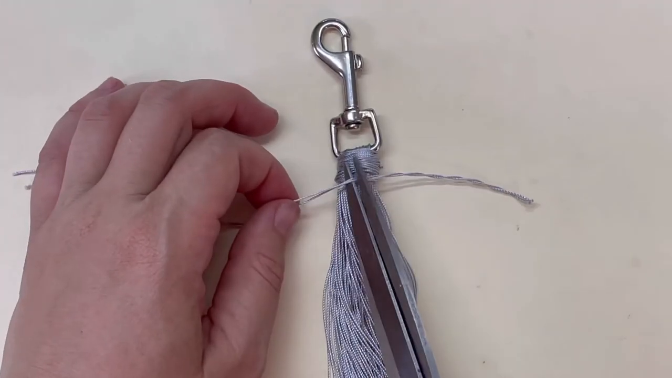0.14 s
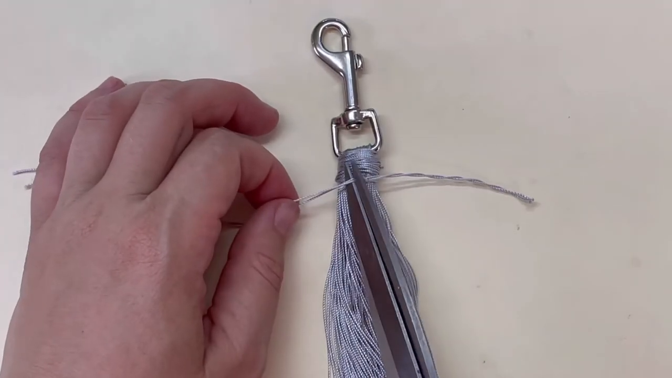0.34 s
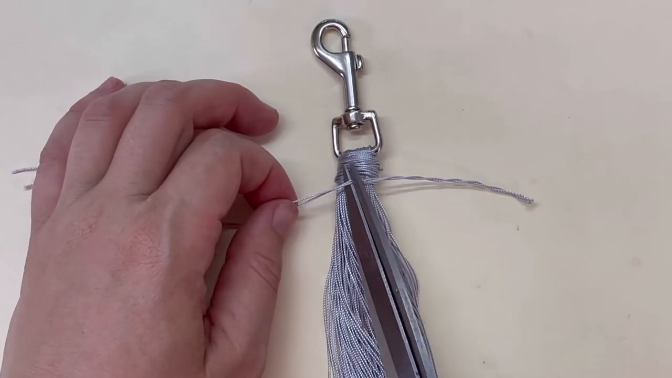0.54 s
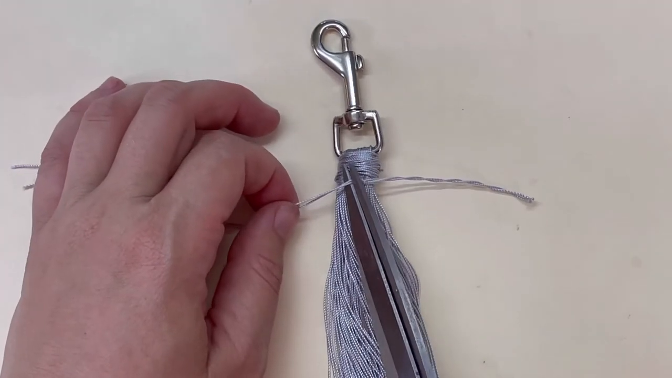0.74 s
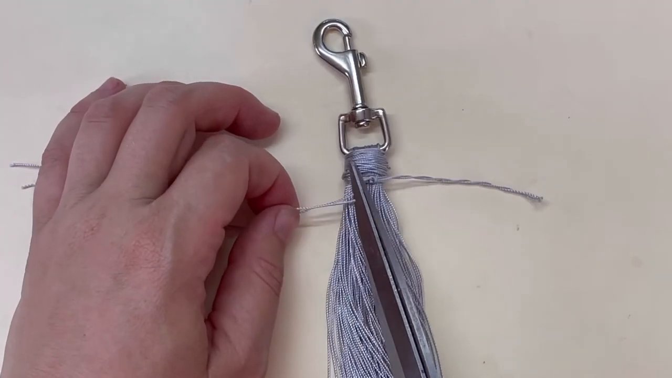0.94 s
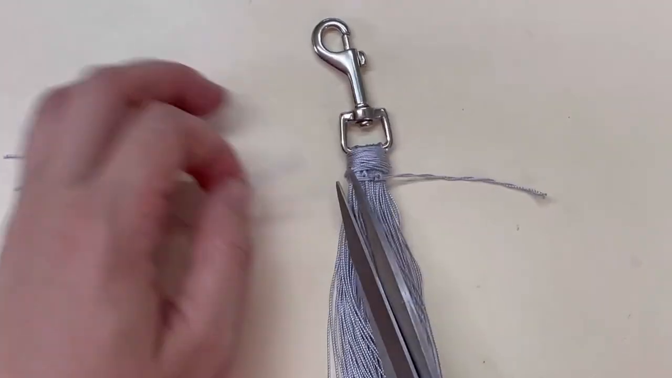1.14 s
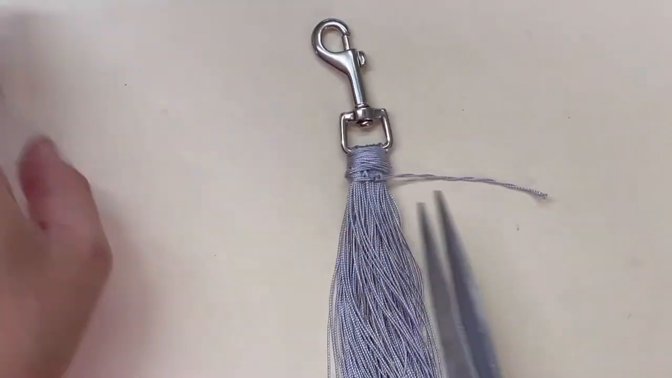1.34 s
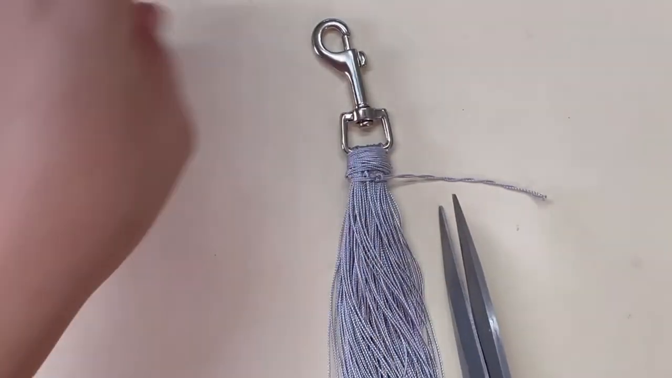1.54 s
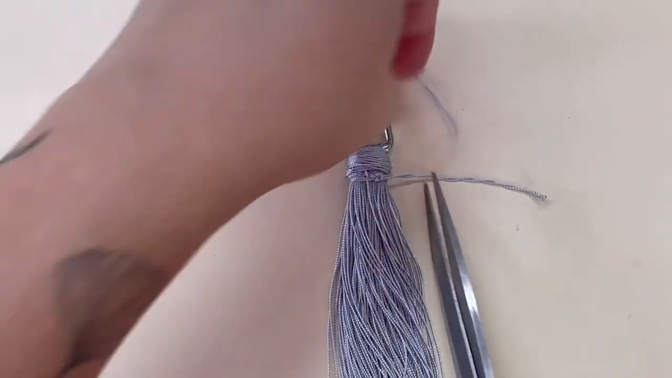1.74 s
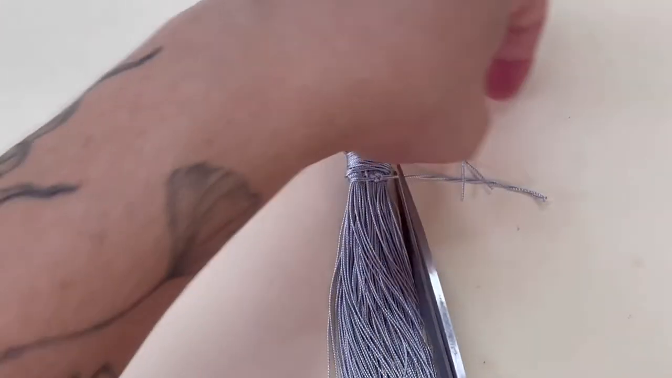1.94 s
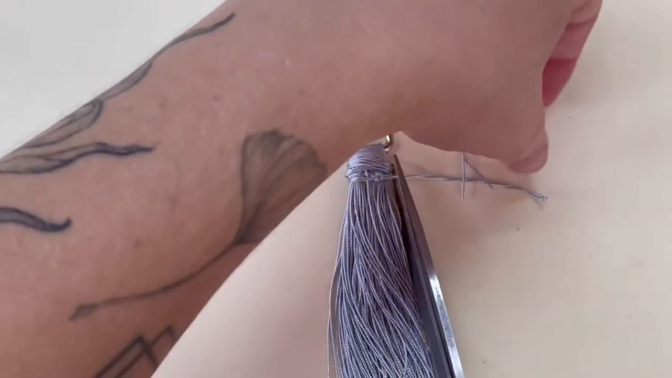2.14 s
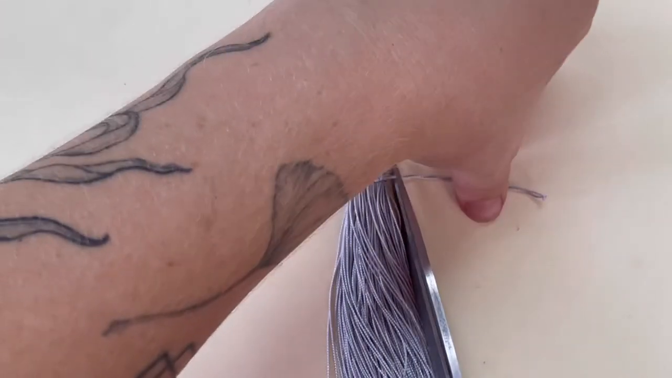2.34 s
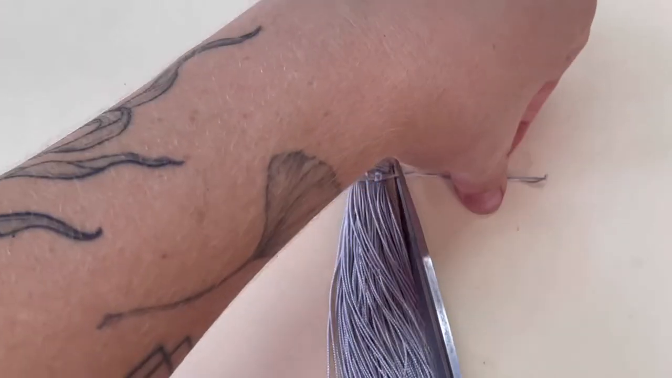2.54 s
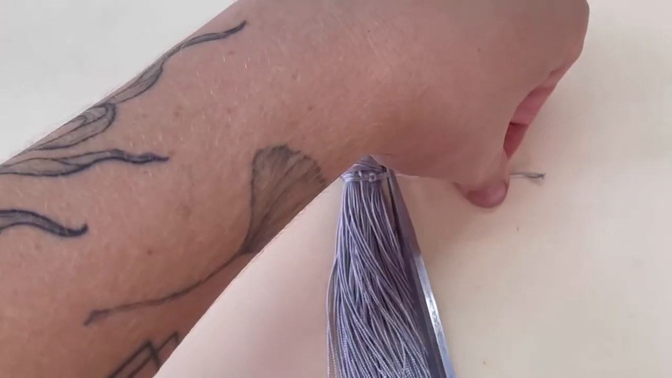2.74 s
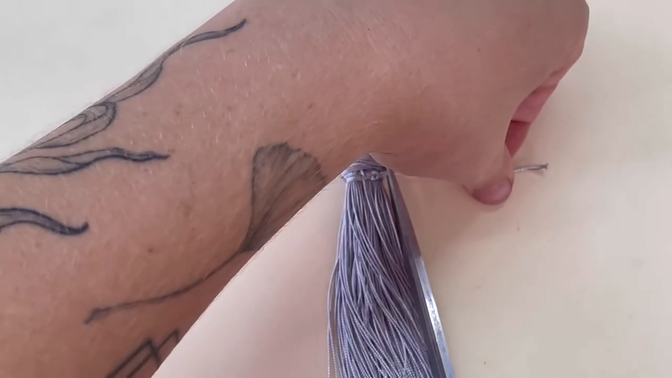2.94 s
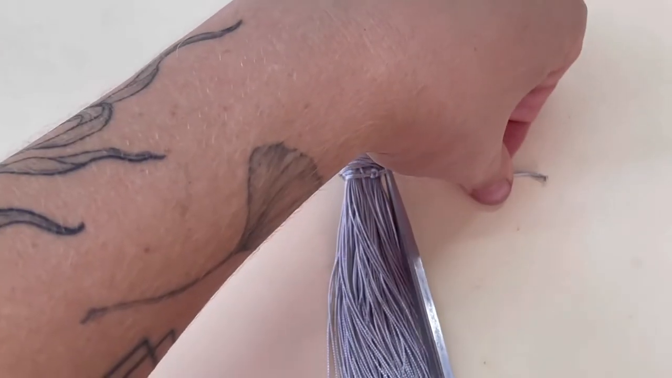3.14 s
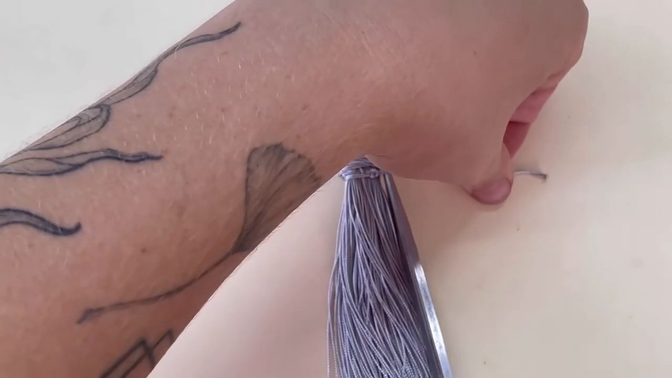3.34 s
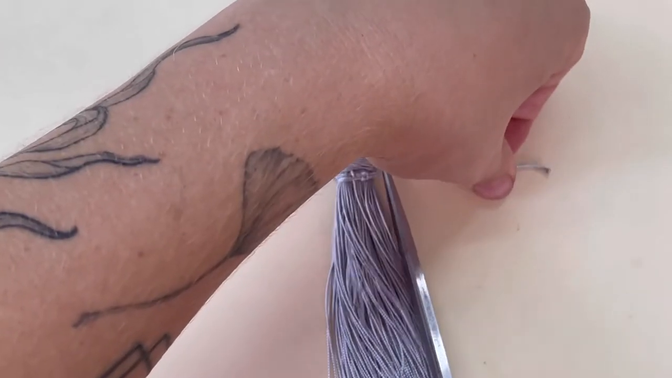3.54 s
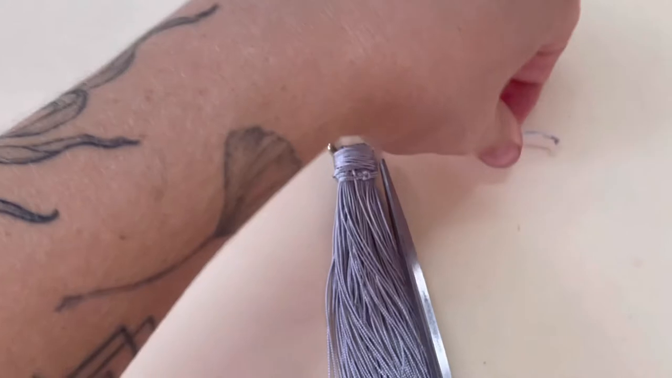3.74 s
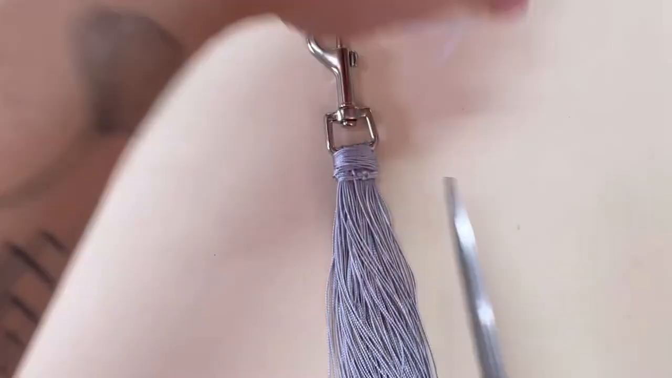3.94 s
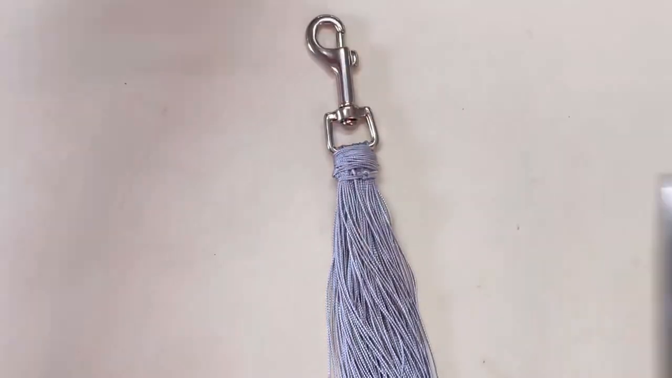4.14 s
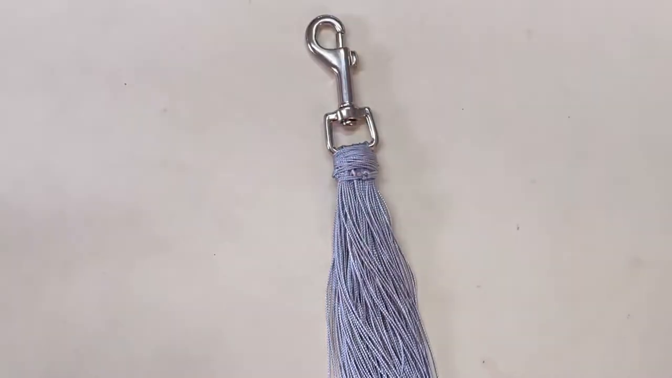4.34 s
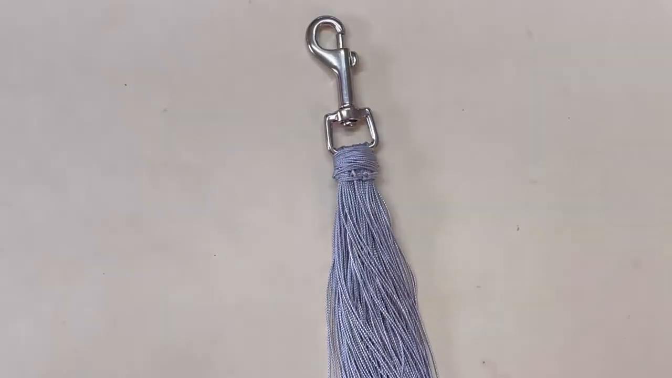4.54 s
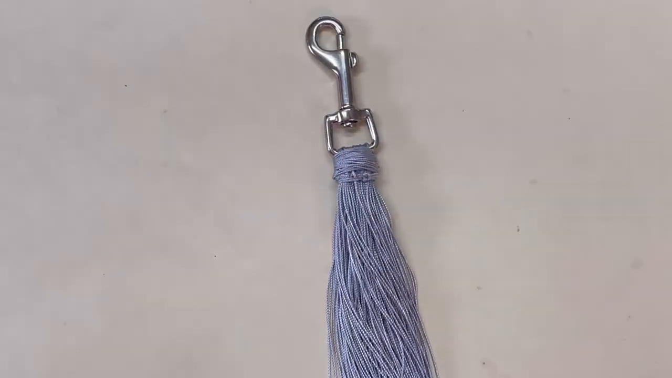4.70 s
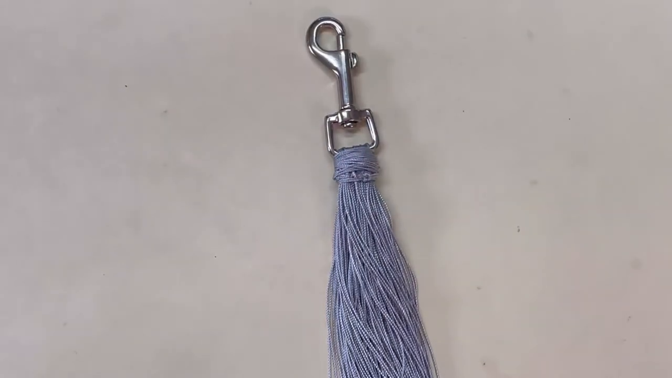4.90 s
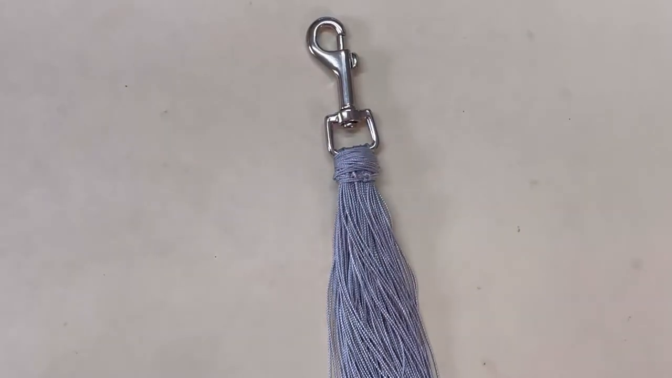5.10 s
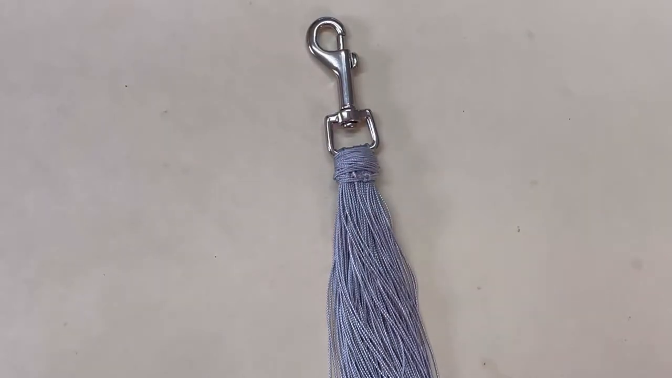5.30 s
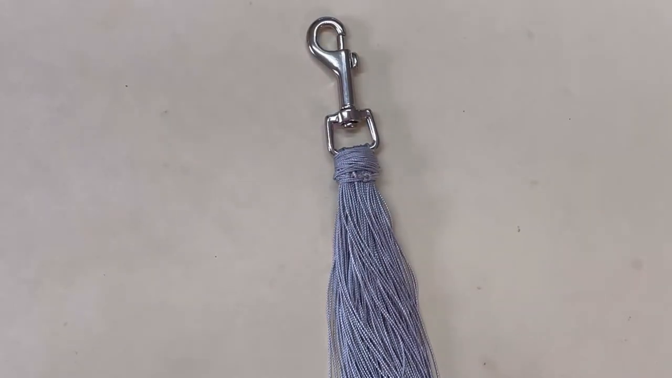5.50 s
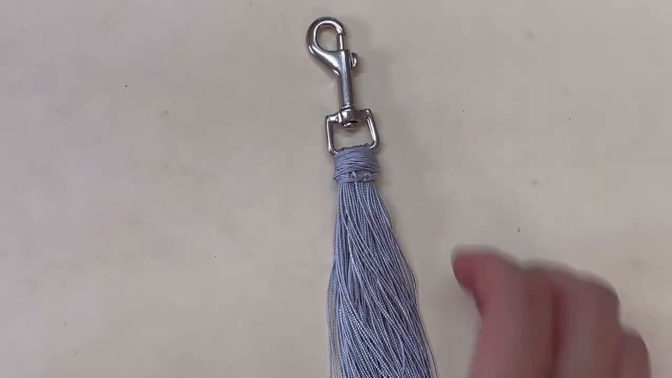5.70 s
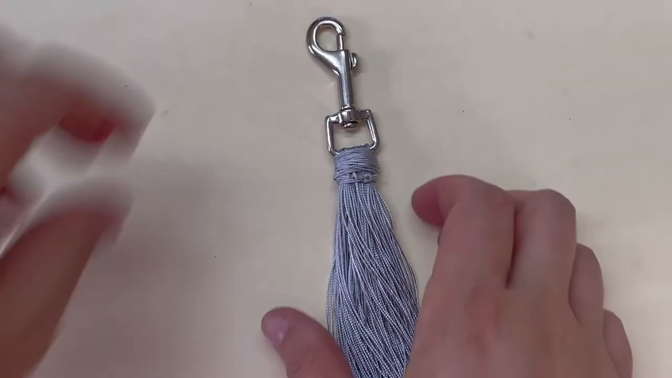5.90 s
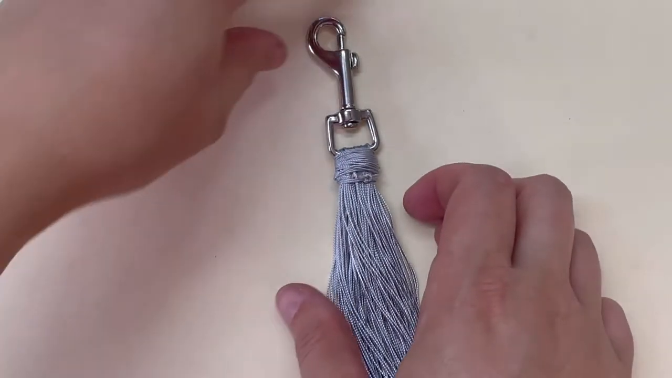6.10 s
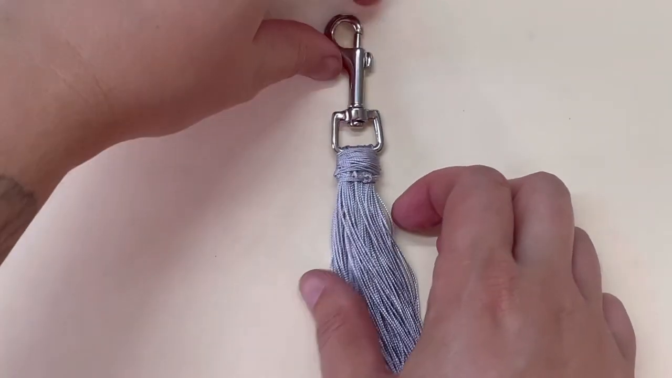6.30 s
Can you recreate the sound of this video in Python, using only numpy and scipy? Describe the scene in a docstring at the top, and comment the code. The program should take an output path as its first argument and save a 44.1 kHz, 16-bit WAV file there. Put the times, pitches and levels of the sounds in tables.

```python
"""Small steel scissors trim two thread ends from a tassel on a table, close to a phone in a small room.
Each snip is a burst of parting fibres (noise), a snap (damped modes, smeared impact) and a ring (sines).
The scissors are laid down with knocks: dispersive bending waves that run through the table top as
falling chirps, with its modes and sway. Hands slide softly over its surface as grainy friction noise;
light ticks, catching blades, scrapes and a steady low room tone complete the scene."""
import sys
import numpy as np
from scipy import signal
from scipy.fft import rfft, irfft
from scipy.io import wavfile
from scipy.ndimage import uniform_filter1d

SR = 44100
rng = np.random.default_rng(int(sys.argv[2]) if len(sys.argv) > 2 else 0)


def materialize(psi):
    """Save the field psi as 16-bit PCM at rate SR to the path in sys.argv[1].

    A 1-D psi becomes a single channel; in a 2-D psi each row is a channel.
    """
    bounded = np.clip(np.atleast_2d(psi).T, -1, 1)
    quanta = np.round(bounded * 32767).astype(np.int16)
    wavfile.write(sys.argv[1], SR, quanta)


N = 284886
T = np.arange(N) / SR
AGE = T[:2 ** 15]  # time since a hit [s]
SIDES = np.array([[1], [-1]])  # left, right


def undb(db):
    """Level to amplitude: 20 dB is a factor of ten."""
    return 10 ** (np.asarray(db) / 20)


def bins(x):
    """Fourier frequencies of x [Hz], kept above zero for logarithms."""
    return np.maximum(np.fft.rfftfreq(x.shape[-1], 1 / SR), 1)


def along(hz, points):
    """Linear interpolation of (frequency [Hz], value) points on a log-frequency axis."""
    point_hz, value = np.transpose(points)
    return np.interp(np.log(hz), np.log(point_hz), value)


def colour(x, points):
    """Minimum-phase filtering through (frequency [Hz], level [dB]) points by folding the cepstrum."""
    n = x.shape[-1]
    cepstrum = irfft(np.log(undb(along(bins(x), points))), n)
    cepstrum[1:n // 2] *= 2
    cepstrum[n // 2 + 1:] = 0
    return irfft(rfft(x) * np.exp(rfft(cepstrum)), n)


def noise(points):
    """Stationary random noise of rms 1 with the given spectral shape."""
    x = colour(rng.standard_normal(N), points)
    return x / x.std()


def blow(x):
    """Energy normalisation: a hit gets the energy of 5 ms at rms 1."""
    return x / np.sqrt(np.sum(x ** 2) / (.005 * SR))


def fade(t60):
    """Exponential damping: 60 dB of decay in t60 [s]."""
    return np.exp(-np.log(1000) * AGE / t60)


def onset(build_s):
    """Gradual energy build-up over about build_s [s]."""
    return 1 - np.exp(-(AGE / build_s) ** 2)


def burst(t60):
    """Exponentially damped random noise."""
    return rng.standard_normal(len(AGE)) * fade(t60)


def ring(modes):
    """Modal superposition: damped sines with random phases, from (frequency [Hz], level [dB], t60 [s])."""
    partials = (undb(db) * fade(t60) * np.sin(2 * np.pi * (hz * AGE + rng.random()))
                for hz, db, t60 in modes)
    return blow(sum(partials))


def add(out, s, x):
    """Linear superposition: mix x into out at time s [s]."""
    i = int(s * SR)
    out[i:i + len(x)] += x[:N - i]


def walk(rate):
    """Low-pass random fluctuation with a standard deviation of 1; rate in steps per second."""
    step = int(SR / rate)
    held = np.repeat(rng.standard_normal(N // step + 1), step)
    x = uniform_filter1d(held, step)[:N]
    return x / x.std()


# spectral shape of the room tone: (frequency [Hz], relative level [dB])
RUMBLE = [(20, -17), (35, -10.5), (48, -5.5), (62, 4), (75, 4), (90, 2), (125, -10), (180, -17.5),
          (300, -26.5), (600, -38), (1500, -45), (4000, -51), (12500, -51), (15500, -72.5)]
RUMBLE_DB = -56.5


def room_tone():
    """Stationary background noise, strongest at low frequencies."""
    return undb(RUMBLE_DB) * noise(RUMBLE)


def room(x, wet_db=-21, t60=0.3, build_s=0.0023):
    """Diffuse reverberation of a small furnished room: echoes build up, then decay exponentially."""
    tail = burst(t60) * onset(build_s)
    tail = colour(tail, [(200, -1.0), (1500, 0.0), (3000, -6.0), (7000, 0.5), (12500, -2.5), (15500, -6.5)])
    return undb(wet_db) * signal.fftconvolve(x, tail / np.sqrt(np.sum(tail ** 2)))[:N]


# first echoes from the table top and things on it: (delay [s], level re direct sound [dB])
ECHOES = [(.00075, -24.5), (.0039, -21)]


def reflect(x):
    """Comb filtering: delayed reflections from hard surfaces interfere with the direct sound."""
    echoes = sum(undb(db) * np.exp(-2j * np.pi * bins(x) * lag) for lag, db in ECHOES)
    return irfft(rfft(x) * (1 + echoes), N)


def ports(x, phase):
    """Interaural-style phase difference: the left port leads the right by (frequency [Hz], phase [rad])."""
    return irfft(rfft(x) * np.exp(.5j * SIDES * along(bins(x), phase)), N)


def move(start, end, attack_s, release_db_per_s):
    """Contact envelope of sliding: it sets in around start, holds, and dies away exponentially after end."""
    attack = np.clip((T - start) / attack_s + .5, 0, 1)
    return attack * undb(-release_db_per_s * np.maximum(T - end, 0))


def friction(points, patchy_db=2.75, shift_rate=22, catch_rate=200, catch_db=9):
    """Stick-slip noise: dense slips and sparse larger catches; quarter-octave bands wander in level."""
    catches = (rng.random(N) < catch_rate / SR) * rng.laplace(size=N)
    slips = rfft(colour(rng.standard_normal(N) + undb(catch_db) * catches, points))
    band = np.floor(4 * np.log2(np.maximum(bins(T), 400) / 400))  # one band up to 400 Hz
    x = sum(irfft(slips * (band == k), N) * undb(patchy_db * walk(shift_rate)) for k in np.unique(band))
    return x / x.std()


# skin sliding over the table: (start [s], fastest [s], end [s], relative friction at the fastest [dB],
# swell [dB], fine hiss re friction [dB], relative board murmur [dB])
STROKES = [(1.412, 1.665, 1.81, -69, 5.5, 0.5, -71), (1.772, 1.94, 2.045, -68, 6, 3, -70.5),
           (2.041, 2.077, 2.19, -78, 22.5, 0.5, -65.5), (2.225, 2.254, 2.38, -75, 8, 1.5, -70.5),
           (2.631, 2.78, 2.91, -97, 12, -8, -69), (3.99, 4.06, 4.07, -84, 5, 3, -80),
           (4.071, 4.266, 4.306, -64.5, 3.5, -3.5, -66.5), (4.325, 4.47, 4.566, -61, 7.5, -6, -64.5),
           (4.55, 4.557, 4.66, -72.5, 5.5, -4.5, -66.5), (5.28, 5.306, 5.386, -68.5, 6, -13, -65.5),
           (5.389, 5.454, 5.68, -72.5, 7, -5.5, -69), (5.549, 5.632, 5.71, -77, 7, -4, -75),
           (5.71, 5.897, 6.1, -65.5, 9.5, -3, -66), (5.833, 5.895, 6.01, -74, 13, 6.5, -73),
           (6.191, 6.329, 6.52, -72.5, 4, 5, -68.5)]
STROKE_ATTACK_S, STROKE_RELEASE_DB_PER_S = 0.017, 183
BOARD_SWELL = 0.29  # share of the swell that the board murmur follows


def strokes():
    """Speed-dependent friction gains (rub, hiss, board): each stroke swells to its fastest moment and slows."""
    rub, hiss, board = np.zeros((3, N))
    for start, fastest, end, db, swell_db, hiss_db, board_db in STROKES:
        contact = move(start, end, STROKE_ATTACK_S, STROKE_RELEASE_DB_PER_S)
        speed_db = np.interp(T, [start, fastest, end], [-swell_db, 0, -swell_db])
        rub += contact * undb(db + speed_db)
        hiss += contact * undb(db + hiss_db + speed_db)
        board += contact * undb(board_db + BOARD_SWELL * speed_db)
    return rub, hiss, board


# the skin sticks and stutters for a moment: (time [s], length [s], relative level [dB])
SCUFFS = [(1.885, 0.008, -65), (1.911, 0.018, -67), (1.973, 0.025, -64.5), (2.056, 0.027, -71),
          (2.651, 0.021, -75.5), (6.187, 0.01, -66)]
SCUFF_ATTACK_S, SCUFF_RELEASE_DB_PER_S, SCUFF_GRAIN_DB = .006, 700, 5


def scuffs():
    """Stick-slip friction gain: the skin sticks and lets go in quick random jerks."""
    jerks = undb(SCUFF_GRAIN_DB * walk(250))
    return jerks * sum(undb(db) * move(s, s + length, SCUFF_ATTACK_S, SCUFF_RELEASE_DB_PER_S)
                       for s, length, db in SCUFFS)


def hands(rub_db=-1, press_db=0, hiss_db=-1, grain_db=0.88, waver_db=0.63):
    """Sliding friction: skin rubs over the table in tiny slips and sets the board murmuring."""
    slips = undb(grain_db * walk(500) + waver_db * walk(30))
    rub = friction([(250, -16.5), (700, -1.5), (1000, -0.5), (1500, 0.5), (2300, 2.5), (2800, -1.5),
                    (3300, -0.5), (3900, -9.5), (4600, -8.5), (5400, -15.5), (8000, -13.0), (13000, -19),
                    (15000, -29)])
    hiss = noise([(2000, -11.5), (5200, -1.5), (7000, 0), (8600, 4), (10200, -7.5), (11500, 1.5),
                  (12500, 0), (13800, -8.5), (15500, -18)])
    board = noise([(30, -21.0), (70, 3), (130, 11.0), (250, 4), (480, 3.0), (680, -11.5), (920, -12.5),
                   (1400, -27.0), (3000, -34)])
    rub_gain, hiss_gain, board_gain = strokes()
    skin = undb(rub_db) * rub * np.hypot(rub_gain, scuffs()) + undb(hiss_db) * hiss * hiss_gain
    return slips * skin + undb(press_db) * board * board_gain


BRUSH_S, BRUSH_HALF_S, BRUSH_DB = 5.9, 0.032, -60.5  # centre, time from centre to half gain, level


def brush(grain_db=1.5):
    """Resonantly coloured friction: the palm brushes the table with a short, hollow swell."""
    hollow = noise([(300, -29), (650, -7.0), (900, -0.5), (1100, -10), (1600, -19.5), (4000, -30),
                    (8000, -44)])
    return undb(BRUSH_DB + grain_db * walk(300)) * hollow / (1 + ((T - BRUSH_S) / BRUSH_HALF_S) ** 2)


# the whole table swaying on its legs: (frequency [Hz], relative level [dB], t60 [s])
SWAY = [(69, 0.5, 0.22), (84.2, -1, 0.27), (102.3, 2, 0.18), (120.9, 3.5, 0.28), (148.1, -6, 0.16)]


def sway(build_s=.012):
    """Low modes in fixed phase: the boom swells just after a blow, which always pushes the same way."""
    modes = sum(undb(db) * fade(t60) * np.sin(2 * np.pi * hz * AGE) for hz, db, t60 in SWAY)
    return blow(modes * onset(build_s))


# modes of the table top: (frequency [Hz], relative level [dB], t60 [s])
TABLE_MODES = [(182, -0.5, 0.37), (228, -2, 0.19), (263, 4, 0.25), (314, 0, 0.2), (405, -4, .3),
               (452.4, -6, .28), (498, -5, 0.27), (550, 1.5, 0.092), (640, -9.5, .2), (676, -10.5, 0.14),
               (1116, -13.5, .19)]
# how the table top radiates: (frequency [Hz], relative level [dB])
BOARD = [(60, -18.5), (120, -5), (220, -1.5), (400, 1.5), (560, 0), (680, -2.5), (810, -9), (1080, -9),
         (1400, -13.5)]


def knock(contact_hz, spread=.135, edge_db=-13, edge_path=2.75, modes_db=-11.0, wash_db=-16,
          wash_t60=.2, boom_db=-18, boom_t60=0.43, build_s=.014):
    """Bending-wave dispersion: highs outrun lows, an edge echo follows, and modes and noise build up."""
    hz = bins(AGE)
    travel = 4 * np.pi * spread * np.sqrt(hz)  # phase [rad] whose group delay is spread / sqrt(Hz)
    push = 1 / np.sqrt(1 + (hz / contact_hz) ** 7)  # softer contacts lose their highs
    wave = np.exp(-1j * travel)
    edge = undb(edge_db) * np.exp(-1j * travel * edge_path)
    direct = blow(irfft(push * (wave + edge) * undb(along(hz, BOARD))))
    wash = undb(wash_db) * blow(colour(burst(wash_t60), BOARD + [(3000, -38.5)]))
    boom_shape = [(100, -7.5), (250, -0.5), (450, -2), (700, -13), (1100, -17), (2000, -40)]
    boom = undb(boom_db) * blow(colour(burst(boom_t60), boom_shape))
    tail = (undb(modes_db) * ring(TABLE_MODES) + wash + boom) * onset(build_s)
    return direct + irfft(push * wave * rfft(tail))


# soft bumps of wrist and hand on the table top: (time [s], level [dB], contact bandwidth [Hz])
BUMPS = [(1.068, -58, 604), (1.4295, -31, 208), (2.059, -53, 460), (2.295, -53, 267.6), (4.074, -60, 808),
         (6.184, -57.5, 800)]
BUMP_SWAY_DB, BUMP_SWAY_SLOPE = -12.5, 0.59  # sway after a bump of 0 dB; dB of sway per dB of bump
# the scissors land, tips first, then the handles:
# (time [s], level [dB], contact bandwidth [Hz], sway from the weight behind it [dB])
LANDINGS = [(4.766, -20, 847, -33), (4.768, -22, 225, -37.5), (4.7982, -28.5, 927, -33.5),
            (5.0043, -14.5, 591.8, -23.5), (5.0266, -23.5, 563, -36), (5.0395, -18, 616, -26),
            (5.077, -18, 532, -30)]


def table():
    """Impact excitation: hand and scissors strike the table top, which rings and sways under their weight."""
    out = np.zeros(N)
    for s, db, contact_hz in BUMPS:
        bump_sway = undb(BUMP_SWAY_DB + BUMP_SWAY_SLOPE * db)
        add(out, s, undb(db) * knock(contact_hz) + bump_sway * sway())
    for s, db, contact_hz, sway_db in LANDINGS:
        add(out, s, undb(db) * knock(contact_hz) + undb(sway_db) * sway())
    return out


# steel scraping on thread and table:
# (start [s], end [s], relative level [dB], relative table drone [dB])
SCRAPES = [(1.041, 1.072, -57.5, -63), (1.13, 1.143, -71.5, -64), (4.761, 5.076, -60.5, -52.5)]
SCRAPE_ATTACK_S, SCRAPE_RELEASE_DB_PER_S = 0.011, 273
# spectral shape of rough steel contact, also heard in the catches: (frequency [Hz], relative level [dB])
STEEL = [(300, -29), (500, -0.5), (900, -7), (1500, -4.5), (2700, 0.5), (3700, -1), (4500, -2.5),
         (6200, -4.5), (8000, -10), (10500, -5.5), (12500, -11), (15500, -21.5)]


def scrapes(gain_db=-1, grain_db=2.0, board_db=1):
    """Rough sliding friction: the blades drag with a catching grain, and pressed on the table make it drone."""
    steel = undb(gain_db + grain_db * walk(500)) * friction(STEEL)
    board = noise([(25, -24.0), (55, -2.5), (110, 7), (300, -13.0), (460, -2.0), (650, -16.0),
                   (900, -18.0), (2000, -44.5)])
    out = np.zeros(N)
    for start, end, db, drone_db in SCRAPES:
        contact = move(start, end, SCRAPE_ATTACK_S, SCRAPE_RELEASE_DB_PER_S)
        out += contact * (undb(db) * steel + undb(board_db + drone_db) * board)
    return out


# catches of the reopening blades: (time [s], level before the treble tilt [dB], treble from 10 kHz up [dB])
CHATTER = [(1.0496, -51.5, -1.5), (1.0632, -53.5, -7), (1.0689, -54, -7), (1.0793, -53, 1.5)]
# resonances of the half-open blades: (frequency [Hz], t60 [s], relative level [dB])
CHATTER_MODES = [(2240, 0.01, -7), (2750, 0.014, -4), (3500, 0.014, -12), (4960, 0.0087, -17),
                 (6200, 0.011, -9), (8700, .008, -3), (12300, 0.009, -2), (14200, .008, -9)]


def chatter(grit_db=-8, grit_t60=0.014):
    """Heavily damped modes: reopening blades catch on each other, each catch a gritty ping."""
    out = np.zeros(N)
    for s, db, treble_db in CHATTER:
        ping = ring([(hz, mode_db, t60) for hz, t60, mode_db in CHATTER_MODES])
        grit = undb(grit_db) * blow(colour(burst(grit_t60), STEEL))
        add(out, s, undb(db) * colour(ping + grit, [(4000, 0), (10000, treble_db)]))
    return out


# light contacts of blades, finger loops and clasp, each sounding a fixed short delay after its time:
# (time [s], relative peak level [dB], relative treble [dB])
TICKS = [(0.0794, -54.5, -11), (0.223, -58.5, -5), (0.8192, -48.5, -16), (0.8284, -36, -26.5),
         (1.0632, -43, -23), (1.1425, -43, -23), (1.419, -34.5, -29), (1.4287, -41.5, -32),
         (1.451, -47.5, -31), (1.7585, -45.5, -24), (1.886, -48, -30), (2.242, -41.5, -40),
         (2.095, -49.5, -18), (2.2943, -49.5, -15), (2.381, -38.5, -2), (2.478, -54, -21), (2.573, -57, -6),
         (2.65, -58, -36), (2.856, -64, -15), (3.143, -61.5, -12), (3.358, -60.5, -29.5),
         (3.4835, -44.5, -24), (3.7588, -55.5, -20.5), (3.7742, -39, -11), (4.7734, -22.5, -1.5),
         (4.821, -40, -26), (5.102, -42.5, -28), (5.291, -51, -21), (6.1856, -48.5, -41),
         (6.287, -48.5, -24)]
# spectral shape of a click: (frequency [Hz], relative level [dB])
TICK = [(500, -2.5), (1200, -5), (2000, 0.5), (2800, -0.5), (3700, -3), (4800, -4.5), (6300, 0), (8000, -3),
        (12000, 3.5), (14000, -3), (15500, -16)]
# each landing clicks too: the click gains on the knock per octave of contact bandwidth above HARD_HZ
HARD_HZ, CLICK_DB_PER_OCTAVE, CLICK_TREBLE_DB = 871, 22.5, -19.5


def ticks(t60=0.0095, gain_db=-2, neutral_db=-6):
    """Brief contact impulses: clicks from handling and landing; harder landings click louder."""
    out = np.zeros(N)
    landings = [(s, db + CLICK_DB_PER_OCTAVE * np.log2(hz / HARD_HZ), CLICK_TREBLE_DB)
                for s, db, hz, _ in LANDINGS]
    for s, db, treble_db in TICKS + landings:
        click = colour(burst(t60), TICK)
        click = colour(click, [(4000, 0), (10000, treble_db - neutral_db)])
        add(out, s + 0.0011, undb(db + gain_db) * click / np.abs(click).max())
    return out


def clack(smear_s, count=48):
    """Frequency-dependent group delay: each band of a hard steel impact leaves after its own tiny delay."""
    hz = bins(AGE)
    band_delay = smear_s * (0.27 + rng.exponential(size=count))
    delay = np.interp(hz, np.linspace(0, SR / 2, count), band_delay)
    phase = 2 * np.pi * np.cumsum(delay) * SR / len(AGE)
    return irfft(np.exp(-1j * phase)) * fade(0.1)


# snips: (time of closing [s], level [dB]; then re that level: fibre crunch [dB], blade ring [dB],
# bump into the table [dB]; and on its own: table sway [dB])
SNIPS = [(0.8368, -15, -23.5, -25.5, -26, -42.5), (3.4972, -20.5, -14, -27.5, -34.5, -42)]
# spectral shape of the blades meeting: (frequency [Hz], relative level [dB])
SNAP = [(300, -23.5), (800, -9), (1500, -13.5), (2200, -8), (2800, -2.5), (3300, -7.5), (3700, -3.5),
        (5300, -8), (6300, -3), (8500, -0.5), (11000, 0.5), (13500, -3), (15000, -10), (16000, -16)]
# broad, quickly damped resonances of the closing blades; their strength depends on where the blades meet:
# (frequency [Hz], t60 [s], relative level in the first snip [dB], in the second snip [dB])
SNAP_MODES = [(2817, .0075, -3, -7), (3520, 0.0095, -11, -9), (4200, .011, -9, -6),
              (4800, 0.0097, -5.5, -10), (5637, .008, -16.5, -8), (6290, 0.0046, 0.5, 2),
              (7430, 0.0098, -13.5, 0), (8450, 0.0058, 0, -5.5), (10580, .008, -7.5, 1),
              (11920, .006, -2, -10), (11900, 0.015, -2.5, -9.5), (12210, .007, -3, -2),
              (13350, 0.0073, -2.5, -1), (15100, .007, -13, -18)]
# ring of the steel blades:
# (frequency [Hz], t60 [s], relative level in the first snip [dB], in the second snip [dB])
BLADES = [(2934, .24, -7, -11), (3480, .22, -14, -7.5), (4199, .3, -4.5, -8), (4400, .24, -21, -2),
          (5570, .24, -11, -12.5), (6600, .17, -7.5, -6), (6900, .2, -8, -9), (7391, .17, -9, -0.5),
          (7720, .22, -6, -4.5), (8450, .13, -4.5, -11), (10780, .06, -5.5, 4), (11270, .16, -1, -1),
          (12050, .16, -2, 0), (12820, .15, -0.5, -10.5), (13330, .15, -1, -10), (13670, .11, -4, -3)]


def snips(smear_s=0.00083, clack_db=-6, snap_db=-1, snap_attack_s=0.00012, rebound_s=0.0021,
          rebound_db=-18, rebound_t60=.013, crunch_s=0.0065, bump_hz=850, shiver_db=-19,
          shiver_t60=0.27, shiver_build_s=.012):
    """Fracture, then impact: fibres part one after another; blades snap, shiver, ring and nudge the table."""
    out = np.zeros(N)
    shiver_shape = [(500, -6), (2000, -10.5), (3500, -7.5), (5200, -6.5), (8000, 2), (9500, -1),
                    (11000, 6.5), (13300, 3.5), (14500, -10.5), (15500, -20)]
    for k, (s, db, crunch_db, ring_db, bump_db, sway_db) in enumerate(SNIPS):
        squeeze = np.minimum(6 * AGE / crunch_s, 1) * (AGE < crunch_s)
        uneven = undb(6.4 * rng.standard_normal(len(AGE)))
        fibres = rng.standard_normal(len(AGE)) * uneven * squeeze
        add(out, s - crunch_s, undb(db + crunch_db) * blow(colour(fibres, SNAP)))

        snap = ring([(hz, strength[k], t60) for hz, t60, *strength in SNAP_MODES])
        snap = undb(snap_db) * blow(snap * onset(snap_attack_s))
        impact = undb(clack_db) * blow(colour(clack(smear_s), SNAP))
        add(out, s, undb(db) * (snap + impact))
        add(out, s + rebound_s, undb(db + rebound_db) * blow(colour(burst(rebound_t60), SNAP)))

        shiver = colour(burst(shiver_t60) * onset(shiver_build_s), shiver_shape)
        blades = ring([(hz, strength[k], t60) for hz, t60, *strength in BLADES])
        steel = undb(ring_db) * blades + undb(shiver_db) * blow(shiver)
        nudge = undb(bump_db) * knock(bump_hz)
        add(out, s, undb(db) * (steel + nudge) + undb(sway_db) * sway())
    return out


# phase lead of the left microphone port: (frequency [Hz], phase [rad])
PORT_PHASE = [(1500, 0), (3500, .17), (4300, .4), (4800, 1.6), (4950, 1.6), (5150, -.2), (6000, .25),
              (6500, 1), (7500, 1.6), (8500, 2.35), (10000, 3.14), (11200, 3.7), (12500, 4.4), (13600, 5.6),
              (14200, 6.2)]
# further lead for the scissors, which are off centre: (frequency [Hz], phase [rad])
SCISSORS_PHASE = [(100, 0), (500, .2), (1000, .5), (2000, .42), (3500, .38), (4500, .25), (5500, 0)]
# level of the left port over the right: (frequency [Hz], level difference [dB])
PORT_DB = [(150, 0), (290, .5), (500, 2.7), (700, 3.1), (1300, .8), (2400, 0)]


def scene(side_db=-6, table_side_db=0):
    """Two-port superposition with phase and level differences; board murmur and table echo in antiphase."""
    knocks = table()
    steel = reflect(snips() + ticks() + chatter() + scrapes()) + knocks
    skin = reflect(hands() + brush())
    heard = ports(steel, SCISSORS_PHASE) + skin + room(steel + skin) + room_tone()
    balance = undb(SIDES * along(bins(T), PORT_DB) / 2)
    heard = irfft(rfft(ports(heard, PORT_PHASE)) * balance, N)
    murmur = noise([(120, -8.0), (350, 5.0), (700, -0.5), (1300, -6), (2500, -36)])
    _, _, board_gain = strokes()
    wide = undb(side_db) * murmur * board_gain
    echo = colour(room(knocks), [(100, -29.5), (200, -15), (400, -2.0), (700, 1.0)])
    return heard + SIDES * (wide + undb(table_side_db) * echo)


TOP_HZ = 15900


def record(dry):
    """Band limiting: the phone cuts the top with a steep elliptic low-pass."""
    return signal.sosfilt(signal.ellip(8, .2, 70, TOP_HZ, fs=SR, output="sos"), dry)


dry = scene()
out = record(dry)
materialize(out)
```